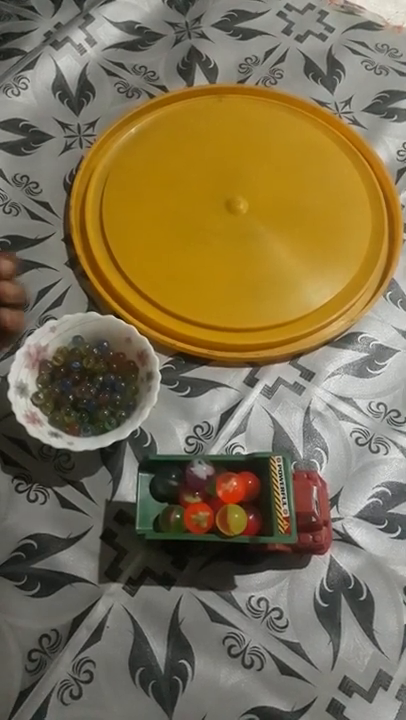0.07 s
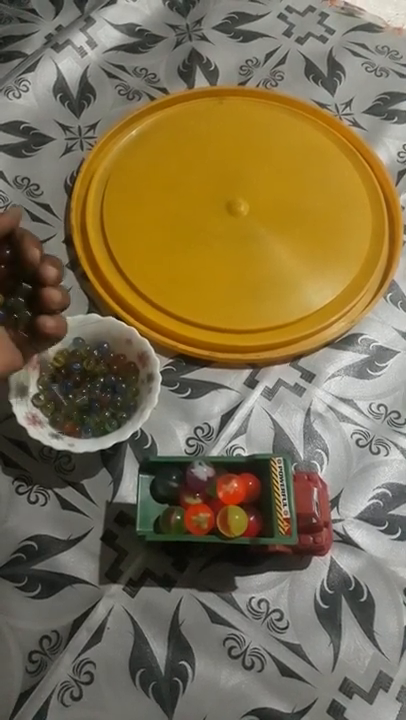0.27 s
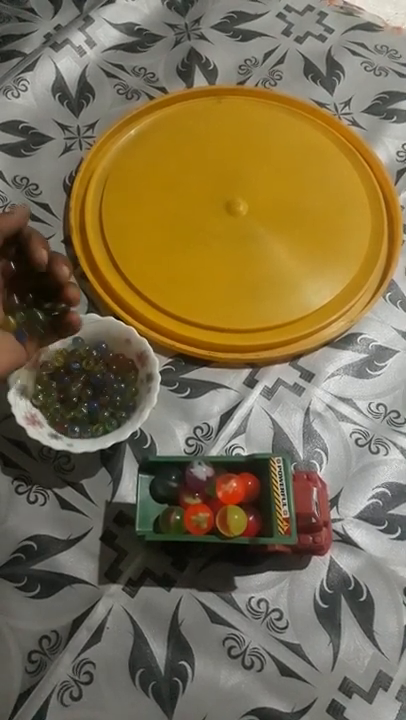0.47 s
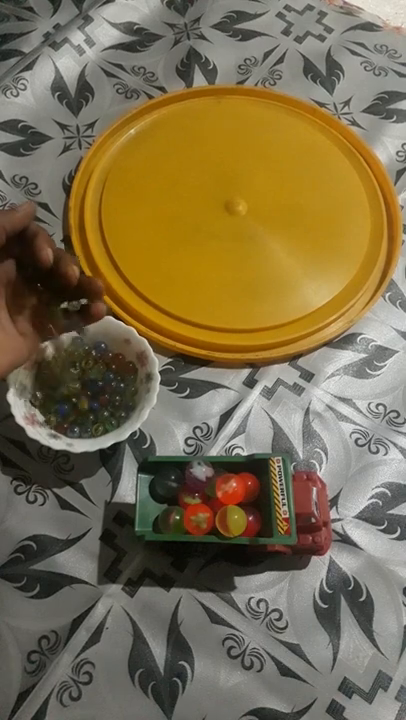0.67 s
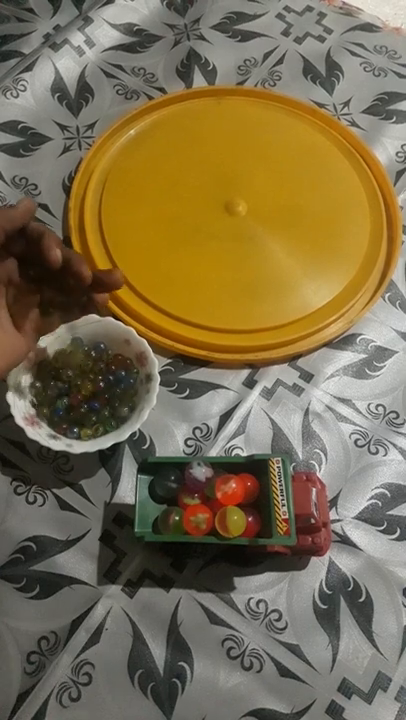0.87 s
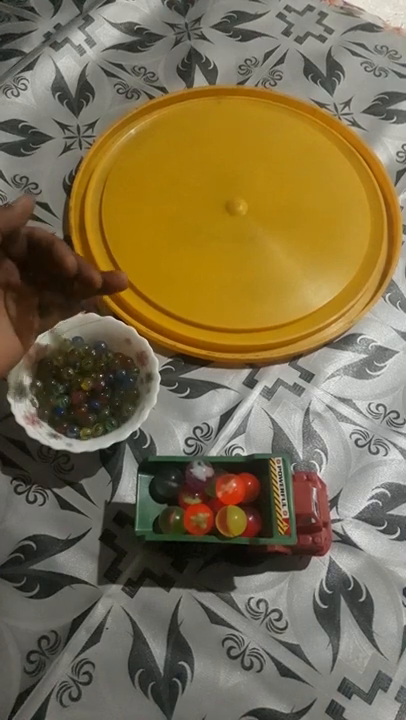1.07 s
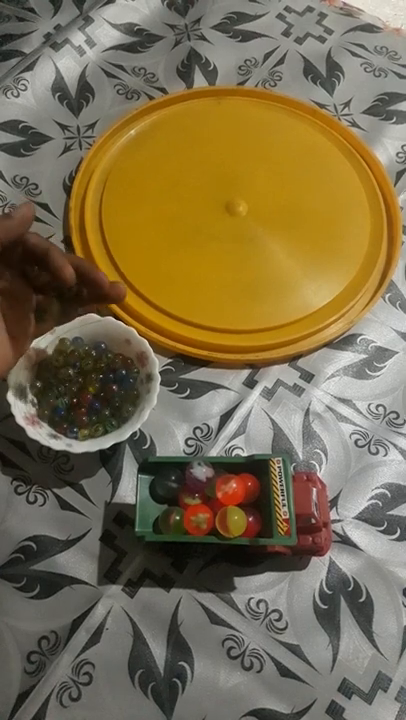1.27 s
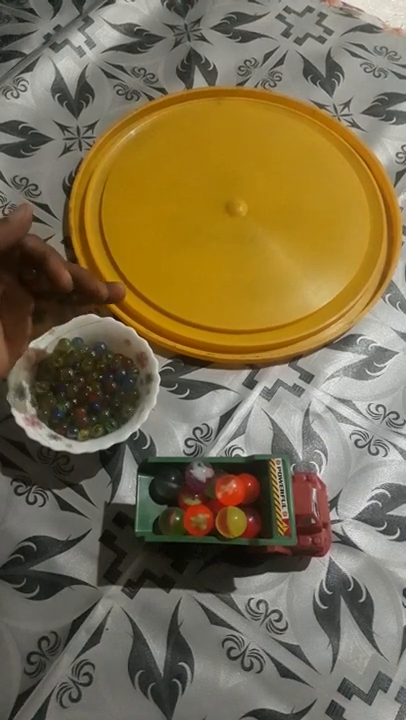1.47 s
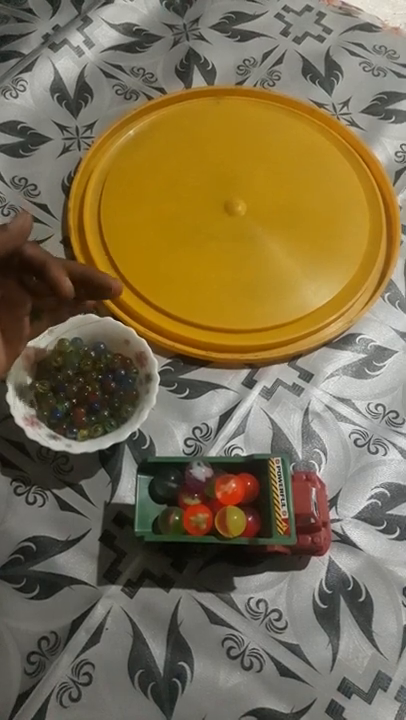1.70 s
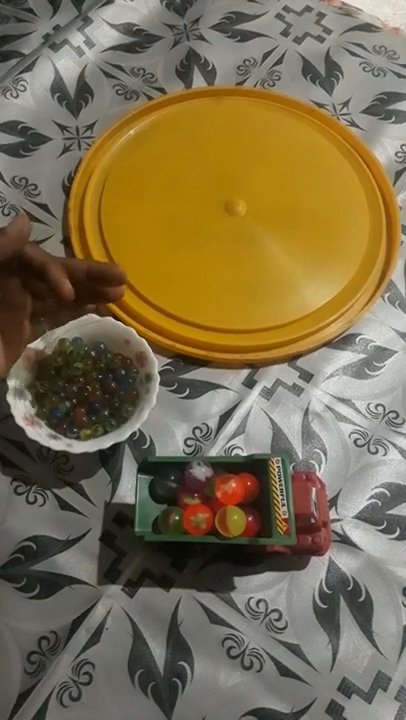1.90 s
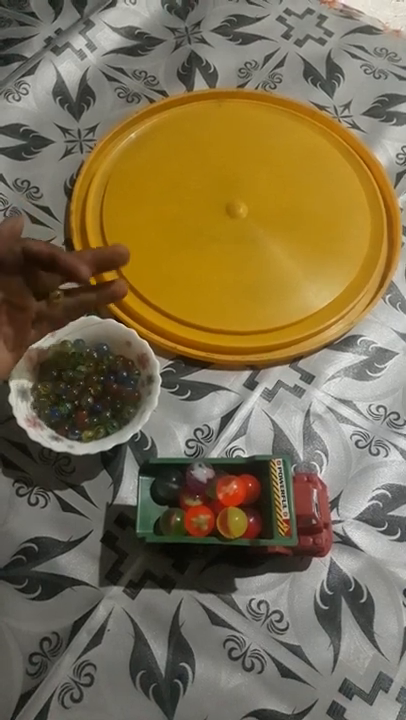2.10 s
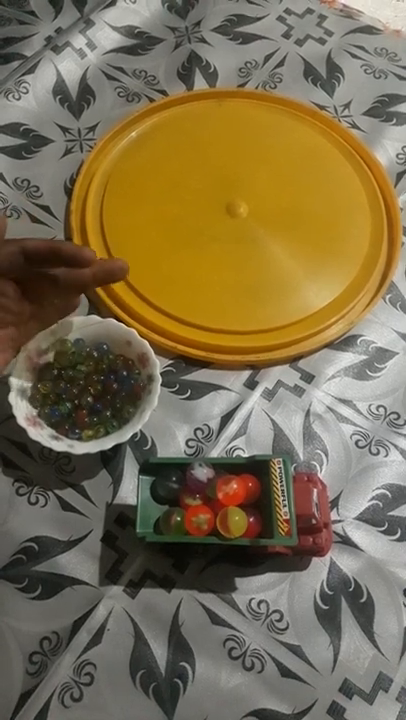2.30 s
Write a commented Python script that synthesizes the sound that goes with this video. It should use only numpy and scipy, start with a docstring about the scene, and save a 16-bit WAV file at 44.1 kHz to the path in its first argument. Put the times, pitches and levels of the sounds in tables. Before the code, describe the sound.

Glass marbles fall into a china bowl of marbles, close by in a small room. After faint ticks in the hand, a dense, bright rattle with short ringing runs from about 0.2 to 1 second. Separate clinks follow, with a last small flurry from 2 to 2.3 seconds ending in thin ringing taps. Soft low handling bumps come during the first 1.5 seconds, and a steady room hush lies underneath.

```python
"""A small room, the microphone near a china bowl full of marbles. Marbles tick faintly in the hand,
then a handful falls in: a dense rattle, each blow a glass click, a knock of the pile and a short ring
of the loaded bowl. After a second it thins out to single clinks, and two late taps on the bare wall
ring on thinly. Soft low bumps of handling reach the microphone through the first second and a half;
the room's steady hush lies under it all."""
import sys
import numpy as np
from scipy import signal
from scipy.fft import rfft, irfft
from scipy.io import wavfile

SR = 44100
rng = np.random.default_rng(int(sys.argv[2]) if len(sys.argv) > 2 else 0)


def log_audio(samples):
    """Write samples as a 16-bit WAV file to the path given in sys.argv[1]."""
    # one column per channel
    frames = np.atleast_2d(samples).T
    # limit to full scale, then quantise
    limited = np.clip(frames, -1, 1)
    pcm = np.round(limited * 32767).astype(np.int16)
    wavfile.write(sys.argv[1], SR, pcm)


N = 108045

# Room tone (frequency [Hz], relative level [dB])
HUSH_SPECTRUM = [(20, -34), (45, -14), (75, -8), (105, 3.5), (140, -5.5), (200, 4), (265, -6), (420, -3.5),
                 (650, -10.5), (1000, -6.5), (1560, -4.5), (2700, -13.5), (4000, -18.5), (7500, -15.5),
                 (9000, -23), (10200, -39), (16000, -33)]
# Decay of the small room (frequency [Hz], t60 [s])
ROOM_T60 = [(100, 0.33), (1500, 0.22), (3200, 0.29), (6000, 0.22), (8500, 0.17), (14000, 0.22)]
# Colour of its tail (frequency [Hz], relative level [dB])
ROOM_SPECTRUM = [(100, -23), (700, 8.5), (1500, 0.5), (3200, -2.5), (6000, 0.5), (9000, -2.5),
                 (14000, -0.5)]
# Bumps of handling and of the bowl on the table (time [s], length [s], level [dB], dulled above [Hz])
BUMPS = [(0.085, 0.086, -32, 301), (0.206, 0.041, -36.5, 297), (0.27, 0.034, -36, 298),
         (0.8, .012, -37.5, 600), (1.132, 0.061, -33.5, 249), (1.18, 0.044, -27.5, 1200),
         (1.209, 0.08, -36.5, 199), (1.305, 0.045, -36.5, 300), (1.418, 0.025, -43, 90),
         (1.47, 0.009, -32.5, 710)]
# Their colour at the microphone (frequency [Hz], relative level [dB])
BUMP_SPECTRUM = [(25, -35), (60, -3.5), (110, 4), (200, 5.5), (300, -1.5), (600, -21.5), (900, -29),
                 (2500, -41)]
# Modes of one hollow handling knock (frequency [Hz], level [dB], t60 [s])
HOLLOW_MODES = [(400, -28.5, 0.042), (566, -34, 0.057)]
# Light touches of marble on marble (time [s], level [dB])
TICKS = [(0.122, -43), (0.147, -38.5), (0.211, -37.5), (1.066, -41), (1.095, -34), (1.9347, -31.5),
         (2.362, -38)]
# Their thin colour (frequency [Hz], relative level [dB])
TICK_SPECTRUM = [(1500, -22), (5000, -7.5), (8500, 3), (10000, -16), (13500, -1.5), (16000, -3.5)]
# Taps on the bare wall of the bowl (time [s], level [dB])
WALL_TAPS = [(.7864, -24), (2.1995, -39), (2.2378, -29)]
# Modes of that wall (frequency [Hz], relative level [dB], t60 [s])
WALL_MODES = [(10700, -13, 0.15), (13460, -2, .08)]
# Square hits of marble on marble (time [s], level [dB])
PINGS = [(.2322, -16.5), (.2761, -9), (.4436, -13), (.8058, -9), (.8385, -13), (.9882, -12), (1.4766, -13)]
# Glass on glass (frequency [Hz], relative level [dB])
CLICK_SPECTRUM = [(800, -33), (2350, -6.5), (2750, -8.5), (3300, -6), (4700, -6), (5200, -2), (6600, -3.5),
                  (7600, 3), (8400, -2), (9050, -2), (9650, -18.5), (10500, -25), (11800, -13), (13200, -7),
                  (15600, -13)]
# Knock of the pile and the table under it (frequency [Hz], relative level [dB])
KNOCK_SPECTRUM = [(50, -28), (170, -15.5), (330, -11), (650, -24.5), (1050, -16), (1500, 3.5), (1900, -1.5),
                  (2400, -1.5), (2720, -13), (5000, -21)]
# Bowl modes, damped by the load of marbles; their balance drifts as the landing spot moves
# (frequency [Hz], relative level [dB], t60 [s], drift [dB/s])
BOWL_MODES = [(3172, -8, 0.02, -2.5), (3244, -9.5, 0.021, -1), (5713, -1, .022, -1),
              (5820, -13, 0.017, 10.5), (6130, -12.5, 0.021, 0.5), (8298, -2, 0.024, 3.5),
              (10790, -20, 0.02, 3.5), (11290, -11.5, 0.023, 0), (11990, -21, .03, 3),
              (12160, -16, .023, 3), (13160, -19, .022, 2), (13370, -18, .026, 3), (14160, -12.5, 0.024, 5),
              (14140, -14, 0.021, 4.5)]
# Borders between the bowl's mode groups (low to middle [Hz], middle to top [Hz])
MODE_GROUP_HZ = [7000, 9500]
# The bowl radiates its top modes widely into the room (frequency [Hz], level against the clicks [dB])
BOWL_RADIATION = [(3200, -2), (8300, -1.5), (11000, 3)]
# Marbles landing; the spot decides which bowl modes ring. Levels are relative.
# (time [s], click [dB], knock [dB], low modes [dB], middle mode [dB], top modes [dB])
BLOWS = [(0.2323, -14, -19, -50, -50, -47), (0.2404, -30, -18.5, -20, -20, -22),
         (0.2671, -30, -29, -16, -12, -11), (0.2756, -14.5, -19, -31, -36, -36),
         (0.2925, -29, -43, -22, -21, -20), (0.3198, -22, -24, -13, -14.5, -14.5),
         (0.3351, -23, -26, -22, -17, -13), (0.352, -16, -29, -23, -20, -21),
         (0.3592, -27, -20.5, -14.5, -16.5, -11.5), (0.3785, -22, -49, -23, -18, -16),
         (0.3934, -14.5, -22, -24, -30, -29), (0.4062, -40, -35, -18, -19, -13),
         (0.4285, -31, -32, -15.5, -19, -15), (0.4437, -16, -18.5, -31, -29, -29),
         (0.4539, -17, -22.5, -18, -32, -33), (0.4596, -23, -42, -40, -17, -13.5),
         (0.5034, -18.5, -25.5, -21, -20, -16), (0.5273, -15.5, -23.5, -37, -34, -28),
         (0.538, -29, -25.5, -24.5, -24, -19), (0.574, -38, -37, -31, -23, -29),
         (0.5919, -13.5, -20, -18.5, -21, -18), (0.6367, -16, -27.5, -19.5, -42, -19.5),
         (0.6596, -22, -27, -23.5, -28, -23), (0.667, -12.5, -19, -27, -17, -20),
         (0.68, -18, -48, -20, -18, -14), (0.7028, -14.5, -25, -15, -22, -14),
         (0.727, -26, -25, -22, -45, -15.5), (0.7382, -15, -27.5, -20, -15, -13.5),
         (.757, -20, -29, -23, -20, -18), (0.7711, -15.5, -20.5, -23, -19, -20),
         (0.7773, -31, -36, -15, -22, -18), (0.7859, -17, -25.5, -11.5, -17, -15),
         (0.8053, -19, -25, -21, -15, -25), (0.8104, -34, -19.5, -26, -15, -13),
         (0.8256, -17, -29, -14, -20, -17), (0.838, -14, -24.5, -14.5, -20, -31),
         (0.8482, -33, -44, -16, -17.5, -26), (0.8596, -33, -28, -16.5, -16, -19),
         (0.8731, -15.5, -23, -13.5, -18, -19), (0.8864, -26, -31, -13, -14, -17.5),
         (0.9031, -30, -39, -44, -14.5, -25), (0.9136, -30, -33, -30, -16.5, -40),
         (0.959, -16.5, -22.5, -17, -35, -16.5), (0.9766, -35, -32, -28, -22, -36),
         (0.9881, -20.5, -20.5, -48, -22, -26), (1.0182, -20.5, -31, -24, -22.5, -24.5),
         (1.1168, -24, -38, -26, -22, -30), (1.179, -34, -59, -38, -35, -44),
         (1.1962, -16, -24, -19.5, -18, -16.5), (1.266, -16.5, -17.5, -21, -23, -21),
         (1.322, -24.5, -50, -28.5, -30, -29), (1.4196, -18, -19.5, -19, -22.5, -17.5),
         (1.4715, -43, -57, -38, -27, -37), (1.4769, -15.5, -19.5, -21, -24, -33),
         (1.5235, -26, -51, -21.5, -20, -28), (1.543, -30, -34, -51, -42, -35),
         (1.7716, -20.5, -20, -14.5, -18.5, -14), (1.783, -22, -47, -23, -21, -29),
         (1.8201, -23.5, -35, -41, -34, -46), (2.0417, -16, -18, -21.5, -28, -24),
         (2.0552, -25, -51, -24, -29, -24), (2.0626, -20, -45, -16, -18.5, -23),
         (2.0932, -17, -21, -20, -17, -24), (2.1042, -16, -27.5, -19.5, -22, -19.5),
         (2.118, -36, -37, -39, -41, -33), (2.152, -32, -40, -50, -41, -44),
         (2.1776, -28.5, -37, -34, -28.5, -42), (2.1994, -23, -35, -28, -28, -34),
         (2.2376, -26.5, -33.5, -22, -20.5, -37), (2.287, -43, -44, -38, -54, -54)]

CLICK_RISE_S, RING_RISE_S, DETUNE_HZ = 0.0001, 0.00089, 22
SETTLED_S, STIFFEN_HZ_PER_S = 0.98, 23  # the modes creep up once the main pour has landed


def amp(db):
    """Decibels to gain."""
    return 10 ** (np.asarray(db) / 20)


def unit(x):
    """Scales to rms 1."""
    return x / np.sqrt(np.mean(x ** 2) + 1e-20)


def read(points, hz):
    """Reads a table on a log-frequency axis."""
    f, value = np.transpose(points)
    return np.interp(np.log(hz + 1), np.log(f + 1), value)


def add(mix, s, sound):
    """Mixes a sound in at time s."""
    part = mix[max(round(s * SR), 0):][:len(sound)]
    part += sound[:len(part)]


def equalise(x, points):
    """Applies a table of gains in dB to a full-length track."""
    return irfft(rfft(x) * amp(read(points, np.fft.rfftfreq(N, 1 / SR))), N)


def colour(x, points, size=4096):
    """Causal filter of unit energy with the given spectrum."""
    log_gain = np.log(amp(read(points, abs(np.fft.fftfreq(size, 1 / SR)))))
    taps = np.fft.ifft(np.exp(np.conj(signal.hilbert(log_gain)))).real[:size // 2]
    return signal.oaconvolve(x, taps / np.linalg.norm(taps))[:len(x)]


def strike_envelope(t, rise, t60):
    """A quick rise and an exponential fade."""
    return (1 - np.exp(-t / rise)) * amp(-60 * t / t60)


def burst(db, t60, rise=CLICK_RISE_S, size=2048, ripple_db=1.93, ripple_hz=616):
    """A contact scattering through the pile: a few ms of noise, coloured differently by every path."""
    envelope = strike_envelope(np.arange(size) / SR, rise, t60)
    spectrum = rfft(rng.standard_normal(size) * envelope)
    flat = spectrum / (abs(spectrum) + 1e-12)
    hz = np.fft.rfftfreq(size, 1 / SR)
    peaks_db = ripple_db * np.interp(hz / ripple_hz, np.arange(size), rng.standard_normal(size))
    x = irfft(amp(peaks_db) * flat, size) * np.sqrt(envelope)
    return amp(db) * x / np.linalg.norm(x) * np.sqrt(0.004 * SR)  # the energy of 4 ms at this level


def chime(modes, size=8192):
    """Freely dying modes after one tap."""
    t = np.arange(size) / SR
    return sum(amp(db) * strike_envelope(t, RING_RISE_S, t60) * np.sin(2 * np.pi * (hz * t + rng.random()))
               for hz, db, t60 in modes)


def room_tone(db=-42.5):
    """The steady hush of the room."""
    return amp(db) * unit(equalise(rng.standard_normal(N), HUSH_SPECTRUM))


def room_echo(x, db=-5, delay_s=0.0043, build_s=0.0037, size=24000):
    """Near walls return a diffuse tail, each band dying at its own speed."""
    hz, t, bands = signal.stft(rng.standard_normal(size), SR, nperseg=256)
    fade = amp(-60 * t / read(ROOM_T60, hz)[:, None])
    bands = bands * amp(read(ROOM_SPECTRUM, hz))[:, None] * fade
    tail = signal.istft(bands, SR, nperseg=256)[1][:size]
    tail *= np.clip((np.arange(size) / SR - delay_s) / build_s, 0, 1)
    return amp(db) * signal.fftconvolve(x, tail / np.linalg.norm(tail))[:N]


def handling(hollow_s=1.192, slips_per_s=100, jitter=0.32, count=16, size=8192):
    """Bumps that reach the microphone: short runs of dull pulses and one hollow knock."""
    out = np.zeros(N)
    add(out, hollow_s, chime(HOLLOW_MODES))
    for s, length, db, dull_hz in BUMPS:
        slip_s = (np.arange(count) + 0.5 + jitter * rng.uniform(-1.36, 1, count)) / slips_per_s
        arch = np.sqrt(abs(np.sin(np.pi * np.minimum(slip_s / length, 1))))
        slips = np.zeros(size)
        slips[np.clip(slip_s * SR, 0, size - 1).astype(int)] = -arch * rng.uniform(0.7, 1, count)
        bump = signal.lfilter(*signal.butter(1, dull_hz, fs=SR), colour(slips, BUMP_SPECTRUM))
        add(out, s, amp(db) * unit(bump) * np.sqrt(length * SR / size))
    return out


def hand_ticks():
    """Marbles touch lightly in the hand and leave the bowl silent."""
    out = np.zeros(N)
    for s, db in TICKS:
        add(out, s, burst(db, t60=0.012))
    return colour(out, TICK_SPECTRUM)


def pile_chatter(count=12, span_s=0.11, below_db=15.5, fade_db_per_s=176, scatter_db=2.5, knock_db=-8):
    """Tiny clicks and knocks spread through the pile as it settles after each blow."""
    out = np.zeros(N)
    for s, *levels in BLOWS:
        for wait in span_s * (np.arange(count) + rng.random(count)) / count:
            db = max(levels) - below_db - fade_db_per_s * wait + scatter_db * rng.standard_normal()
            add(out, s + wait, burst(db, t60=0.0055, size=1024))
    return colour(out, CLICK_SPECTRUM) + amp(knock_db) * colour(out, KNOCK_SPECTRUM)


def wall_taps():
    """Marbles that touch the bowl's bare wall leave a thin, longer ring."""
    out = np.zeros(N)
    for s, db in WALL_TAPS:
        add(out, s, amp(db) * chime(WALL_MODES))
    return out


def glass_pings(pitch_hz=8990, size=1024):
    """A square hit of marble on marble adds a short, high ping."""
    t, out = np.arange(size) / SR, np.zeros(N)
    envelope = strike_envelope(t, rise=0.0004, t60=0.011)
    for s, db in PINGS:
        hz = pitch_hz + DETUNE_HZ * rng.standard_normal()
        add(out, s, 2 * amp(db) * envelope * np.sin(2 * np.pi * hz * t))
    return out


def bowl_ring(s, group_db, scatter_db=1.6, choke=1.45, size=2048):
    """The bowl's modes swell and are choked by the marbles, a little differently with every blow."""
    t = np.arange(size) / SR
    hz, db, t60, drift = np.transpose(BOWL_MODES)
    detune, scatter = rng.standard_normal((2, len(hz)))
    spot_db = np.take(group_db, np.digitize(hz, MODE_GROUP_HZ)) + drift * (s - SETTLED_S)
    gain = amp(db + spot_db + scatter_db * scatter)
    pitch_hz = hz + DETUNE_HZ * detune + STIFFEN_HZ_PER_S * max(s - SETTLED_S, 0)
    turns = np.outer(pitch_hz, t) + rng.random((len(hz), 1))
    fade = amp(-60 * (t / t60[:, None]) ** choke)  # choke above 1: the ring dies faster and faster
    swell = 1 - np.exp(-t / RING_RISE_S)
    return 2 * swell * (gain @ (np.sin(2 * np.pi * turns) * fade))


def collisions(count=3, wait_s=0.012, span_s=0.05, below_db=11.5, fade_db_per_s=110, scatter_db=2.5):
    """Time and levels of every blow, then of the weaker knocks among the neighbours it jostles."""
    for s, *levels in BLOWS:
        levels = np.array(levels)
        yield s, levels
        for wait in wait_s + span_s * rng.random(count):
            scatter = scatter_db * rng.standard_normal(len(levels))
            yield s + wait, levels - below_db - fade_db_per_s * wait + scatter


def falling_marbles():
    """Each collision clicks, knocks the pile and rings the bowl; returns contact noise and ring."""
    clicks, knocks, rings = np.zeros((3, N))
    for s, (click_db, knock_db, *group_db) in collisions():
        add(clicks, s, burst(click_db - 2.5, t60=0.018))
        add(knocks, s, burst(knock_db - 2, t60=0.02, rise=0.00014))
        add(rings, s, bowl_ring(s, group_db))
    return colour(clicks, CLICK_SPECTRUM) + colour(knocks, KNOCK_SPECTRUM), rings


def scene():
    """At one microphone: marbles and bowl direct, the room's echo, handling and room tone."""
    contacts, rings = falling_marbles()
    contacts = contacts + pile_chatter() + glass_pings() + hand_ticks()
    rings = rings + wall_taps()
    echo = room_echo(contacts + equalise(rings, BOWL_RADIATION))
    return (contacts + rings + echo + handling() + room_tone())[None]


def record(dry):
    """The recorder overloads softly on the highest peaks, then limits the band."""
    ceiling, edge_hz = 1.3, 15800
    rounded = ceiling * np.tanh(dry / ceiling)
    lowpass = signal.firwin(255, edge_hz, window=("kaiser", 8), fs=SR)
    return signal.oaconvolve(rounded, lowpass[None], "same")


dry = scene()
out = record(dry)
log_audio(out)
```